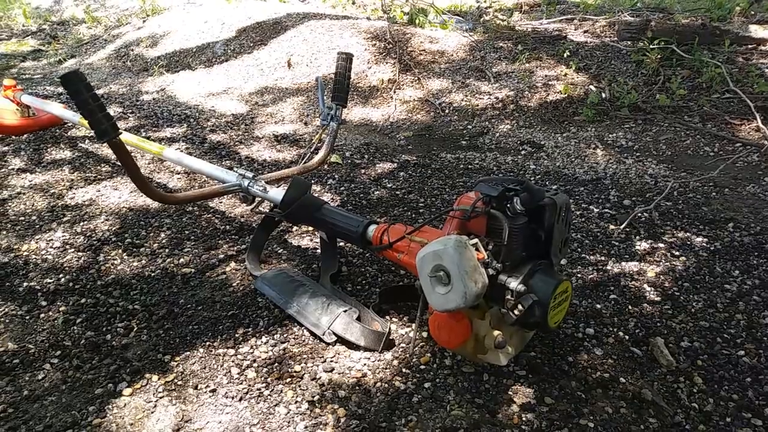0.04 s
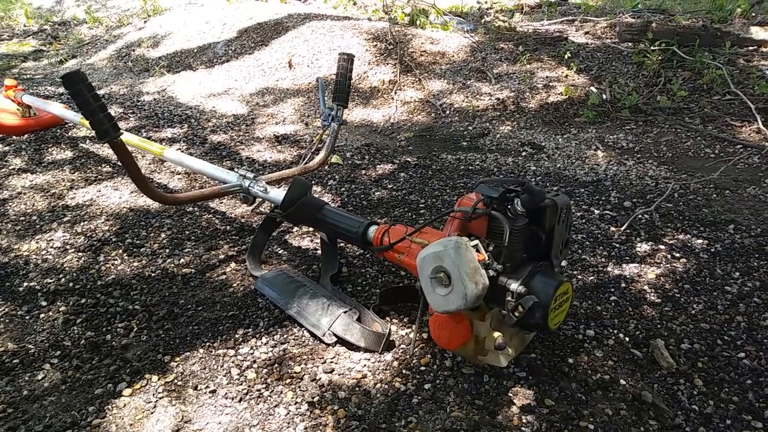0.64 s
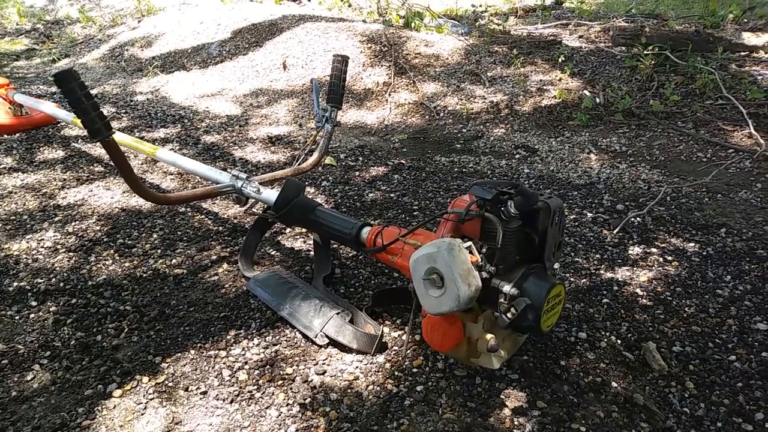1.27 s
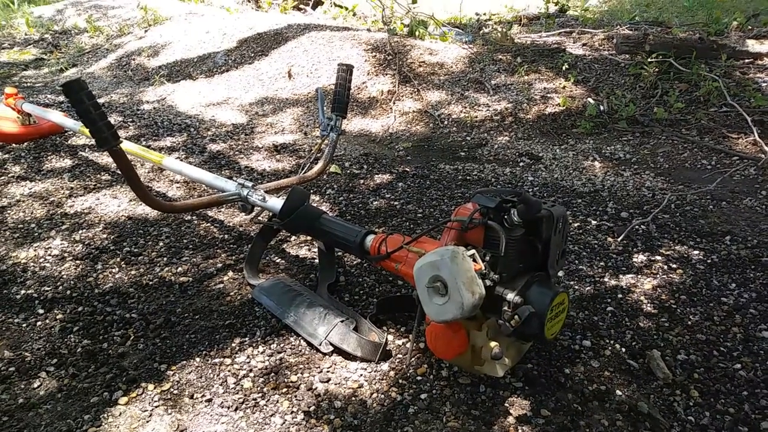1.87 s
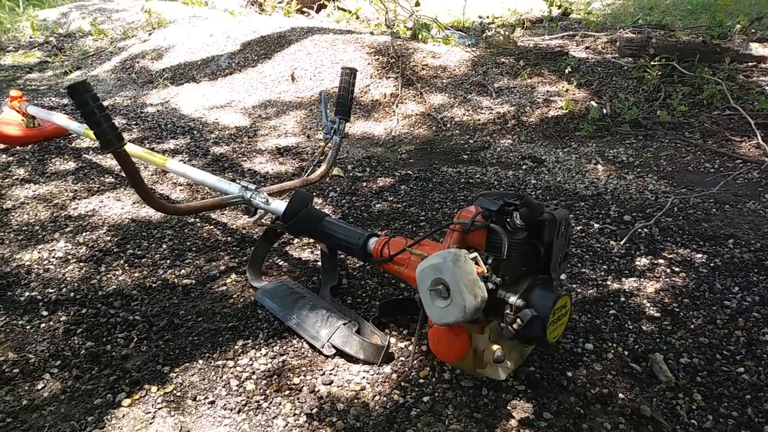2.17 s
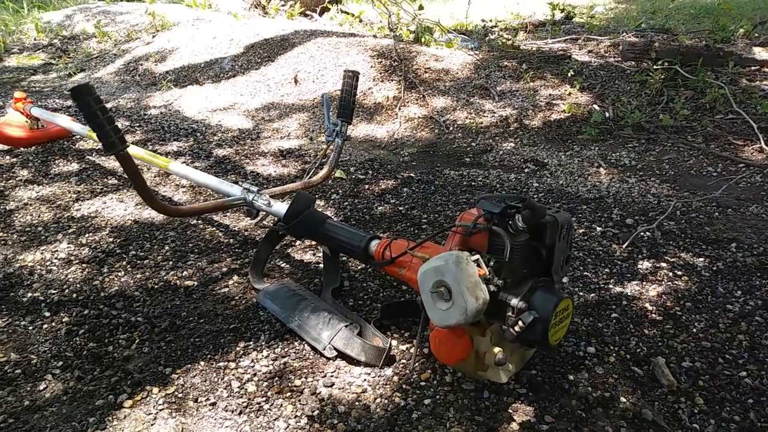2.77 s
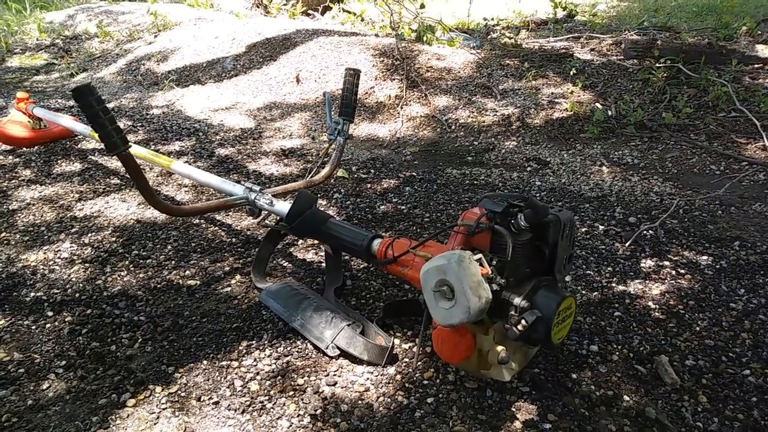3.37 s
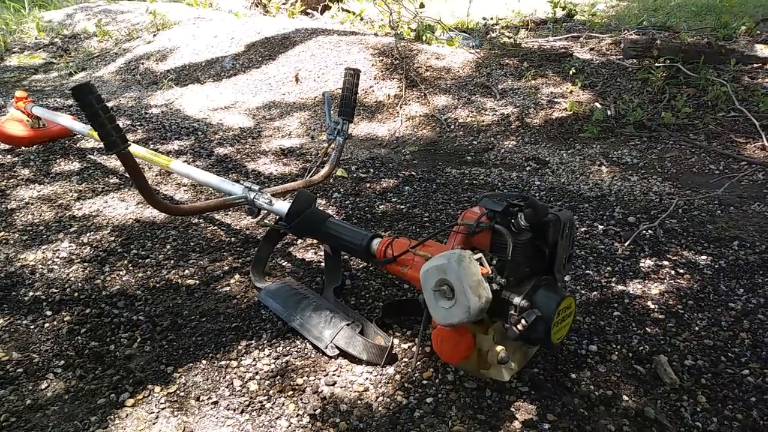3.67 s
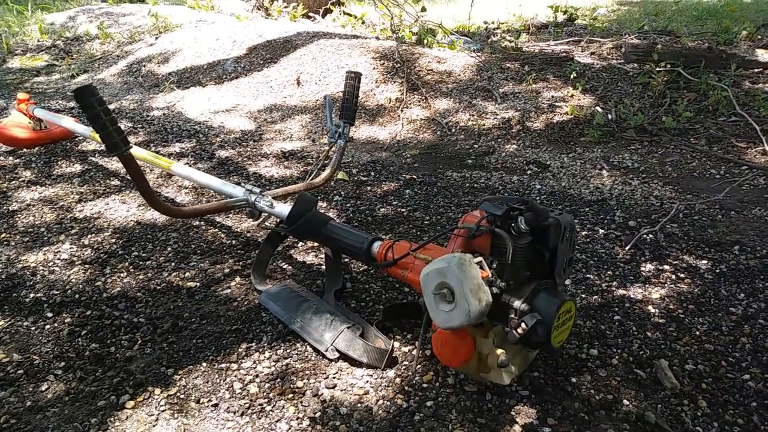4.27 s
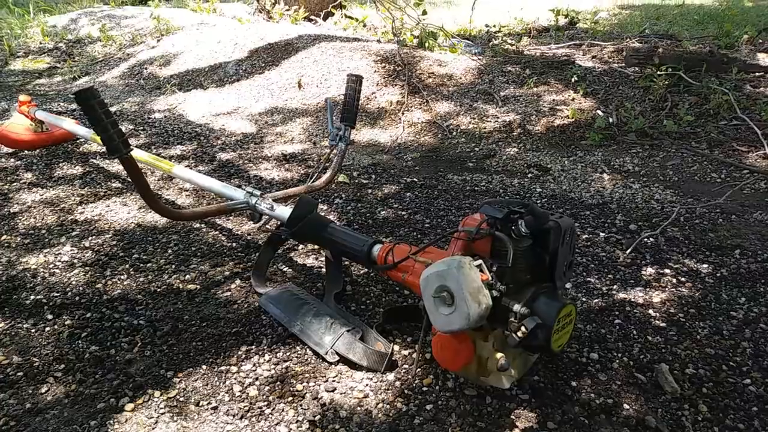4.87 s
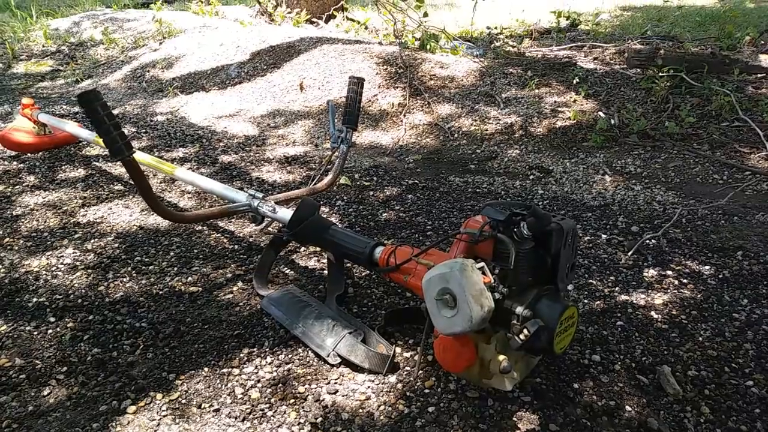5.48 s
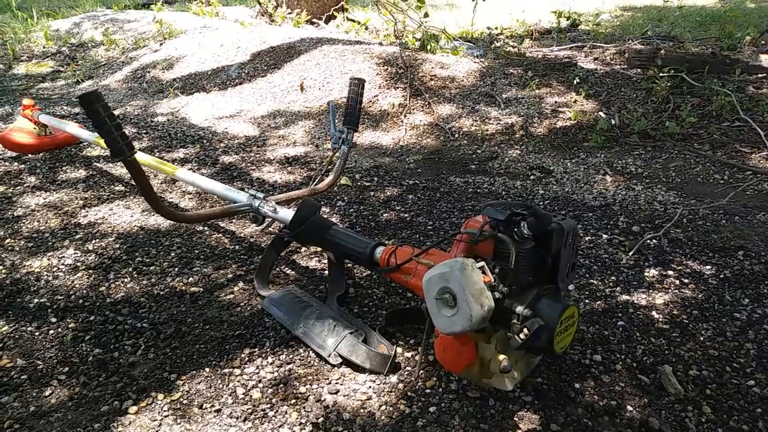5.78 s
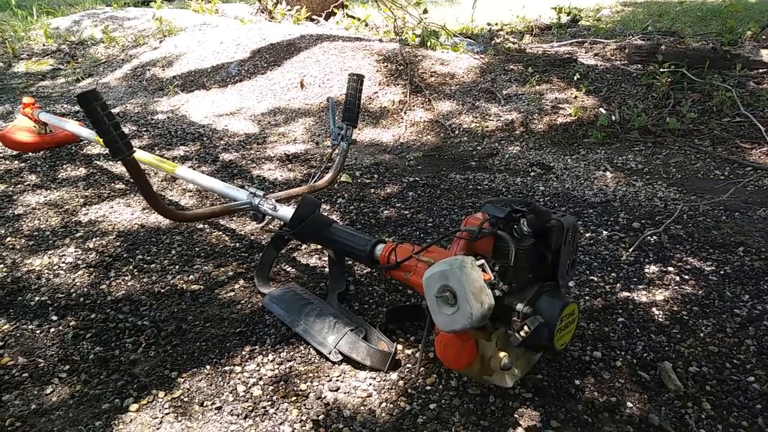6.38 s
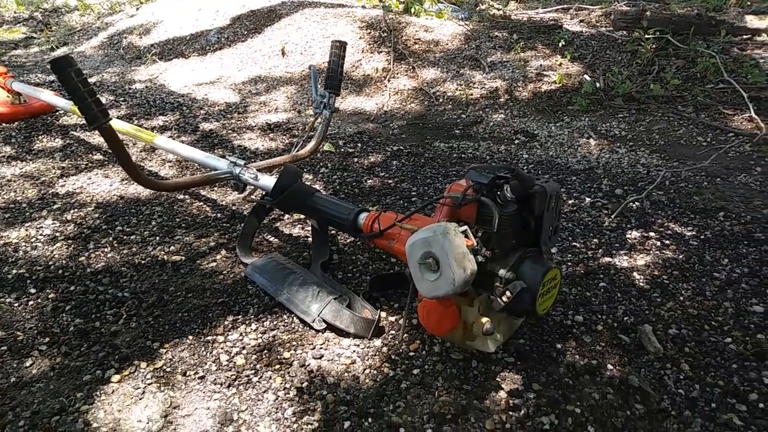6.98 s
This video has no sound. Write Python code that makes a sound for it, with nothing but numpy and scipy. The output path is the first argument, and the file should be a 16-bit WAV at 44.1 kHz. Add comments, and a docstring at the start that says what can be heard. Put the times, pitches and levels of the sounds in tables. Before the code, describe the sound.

A small two-stroke string trimmer idles unevenly, with a bright, ringing metallic rattle clattering over its low putter.

```python
"""A two-stroke string trimmer idles on gravel, about a metre away.
The crank hums, the piston knocks in the finned cylinder and the engine fires unevenly, with dull
pops from the muffler. Fan and muffler hiss; the guard buzzes and small steel parts jingle.
Loose clutch shoes clack against their steel drum, which rings on and warbles with the shaking."""
import sys
import numpy as np
from scipy import signal
from scipy.fft import rfft, irfft, next_fast_len
from scipy.io import wavfile
from scipy.ndimage import uniform_filter1d

SR = 44100
rng = np.random.default_rng(int(sys.argv[2]) if len(sys.argv) > 2 else 0)


def store_pcm(level_fs):
    """Save levels as 16-bit WAV."""
    pcm = np.round(np.clip(level_fs, -1, 1) * 32767).astype(np.int16)
    wavfile.write(sys.argv[1], SR, np.atleast_2d(pcm).T)


N = 318843
TIME = np.arange(N) / SR

# crank speed: (time [s], speed [turns/s])
CRANK_SPEED = [(0.0, 57), (1.35, 56.05), (1.41, 57.6), (1.99, 55.54), (2.52, 57.9), (3.06, 56.52),
               (3.28, 58.0), (3.58, 56.7), (3.66, 54.27), (3.89, 56.45), (4.49, 54.8), (4.55, 55.7),
               (5.05, 54.38), (5.21, 56.64), (6.32, 57.17), (6.36, 55.85), (7.05, 56.77), (7.23, 58.28)]
# bright tick of steel on steel: (frequency [Hz], relative density [dB])
TICK_SPECTRUM = [(6000, -31), (8500, -16), (9100, 5), (9400, 4), (9800, 13), (10350, -2.5), (10800, 3.5),
                 (11700, -1), (12400, -9), (13500, -18), (14400, -13), (14900, 9), (15900, -24)]


def amp(db):
    return 10 ** (np.asarray(db) / 20)


def unit_rms(x):
    return x / np.sqrt(np.mean(x ** 2) + 1e-20)


def add(mix, at_s, sound):
    part = mix[max(round(at_s * SR), 0):][:len(sound)]
    part += sound[:len(part)]


def wander(cutoff_hz, step=16):
    """Low-passed random drift, rms 1."""
    size = next_fast_len(N // step + 2)
    hz = np.fft.rfftfreq(size, step / SR)
    slow = irfft(rfft(rng.standard_normal(size)) / (1 + (hz / cutoff_hz) ** 4), size)
    return unit_rms(np.interp(np.arange(N) / step, np.arange(size), slow))


def colour(x, spectrum, size=2048):
    """Causal filter along (frequency [Hz], level [dB]) points; white input keeps its power."""
    hz, db = np.transpose(spectrum)
    bins_hz = abs(np.fft.fftfreq(size, 1 / SR))
    gain = unit_rms(amp(np.interp(np.log(bins_hz + 1), np.log(hz), db)))
    minimum_phase = np.exp(np.conj(signal.hilbert(np.log(gain))))
    response = np.fft.ifft(minimum_phase).real
    return signal.oaconvolve(x, response[:size // 2])[:N]


def resonate(x, hz, width_hz):
    """Steep resonance: two damped poles in series."""
    pole = np.exp((2j * np.pi * hz - np.pi * width_hz * np.sqrt(2)) / SR)
    return 2 * signal.lfilter([(1 - abs(pole)) ** 2], [1, -2 * pole, pole ** 2], x).real


def turn_times(turns):
    """Times [s] at which the crank completes a turn."""
    return TIME[np.flatnonzero(np.diff(np.floor(turns)) > 0)]


def crank_hum(turns, level_db=-46, waver_db=2):
    """Crank orders, all but the first wavering; 2-4 come from the muffler, 12 from the fan blades."""
    # engine hum: (order [x crank speed], relative level [dB])
    orders = [(1, 7.5), (2, -9.5), (3, 2.5), (4, 3.5), (5, -24), (6, -35), (7, -22), (8, -14.5), (9, -11),
              (10, -32), (11, -33), (12, -4.5), (13, -15.5), (14, -46)]
    # low boom of the muffler: (time [s], gain [dB])
    muffler_boom = [(0, 4), (1.5, 1), (2.5, 3.5), (3.3, -2), (5, -2), (7.23, -10.5)]
    boom = amp(np.interp(TIME, *np.transpose(muffler_boom)))
    uneven_turns = turns + .005 * wander(25)
    out = np.zeros(N)
    for order, db in orders:
        gain = amp(db + (order > 1) * waver_db * wander(24)) * (boom if 2 <= order <= 4 else 1)
        out += gain * np.cos(2 * np.pi * (order * uneven_turns + rng.random()))
    return amp(level_db) * unit_rms(out)


def exhaust(turns, level_db=-56):
    """One steady puff per turn, coloured by the muffler."""
    # muffler response: (frequency [Hz], relative gain [dB])
    muffler = [(150, -4.0), (290, 11.0), (450, -7), (620, -2), (780, -9), (1050, 3.0), (1600, -44.5)]
    puffs = np.diff(np.floor(turns), prepend=0)
    return amp(level_db) * unit_rms(colour(puffs, muffler))


def firing_levels(times_s, arch_db=5, fall_db_per_s=600, vary_db=2, weak_db=-51, weak_vary_db=7):
    """Runs of strong firings swell and die away; turns between them fire weakly or miss."""
    # runs of strong firings: (start [s], length [s], relative level [dB])
    strong_runs = [(0.16, 0.062, -29.5), (0.341, 0.13, -29.5), (0.615, 0.04, -37), (0.708, 0.039, -33.5),
                   (1.156, 0.23, -29), (1.67, 0.12, -28.5), (2.014, 0.073, -33), (2.11, 0.19, -33.5),
                   (2.337, 0.055, -31), (2.397, 0.048, -30), (2.469, 0.04, -39), (2.61, 0.044, -33.5),
                   (2.9, 0.06, -33.5), (3.044, 0.04, -38), (3.094, 0.039, -33.5), (3.64, 0.034, -40.5),
                   (3.698, 0.11, -31.5), (4.152, 0.042, -35), (4.233, 0.067, -35), (4.304, 0.11, -33.5),
                   (4.467, 0.092, -32.5), (4.756, 0.04, -35.5), (4.8, 0.096, -33), (5.099, 0.035, -35.5),
                   (5.219, 0.092, -37.5), (5.362, 0.059, -34.5), (5.504, 0.041, -34), (5.571, 0.048, -41),
                   (5.635, 0.055, -31), (5.968, 0.044, -31.5), (6.205, 0.033, -36.5), (6.644, 0.062, -32.5),
                   (6.812, 0.035, -33.5)]
    start_s, length_s, peak_db = np.transpose(strong_runs)
    off_centre_s = abs(times_s[:, None] - start_s - length_s / 2)
    runs_db = peak_db - arch_db * np.minimum(2 * off_centre_s / length_s, 1) ** 2
    runs_db -= fall_db_per_s * np.maximum(off_centre_s - length_s / 2, 0)
    strong, weak = rng.standard_normal((len(times_s), 2)).T
    return np.maximum(runs_db.max(1) + vary_db * strong, weak_db + weak_vary_db * np.minimum(weak, 1.5))


def firings(turns, pitch_hz=197, sigma_s=.0043, gain_db=6, push=.12, push_hz=118, jitter_s=.002):
    """One dull muffler pop of two or three cycles per turn."""
    t, out = TIME[:SR // 25] - .02, np.zeros(N)
    envelope = np.exp(-(t / sigma_s) ** 2 / 2)
    turn_s = turn_times(turns)
    fire_s = turn_s + jitter_s * rng.standard_normal(len(turn_s))
    for at_s, db in zip(fire_s, firing_levels(turn_s)):
        hz = pitch_hz * (1 + .07 * rng.standard_normal())
        chirp = np.cos(2 * np.pi * hz * (t + 5 * t ** 2) + .5)
        low_push = push * np.cos(2 * np.pi * push_hz * t + .5)
        add(out, at_s + t[0], -amp(db + gain_db) * envelope * (chirp + low_push))
    return out


def piston(turns, slop_turns=.004, pulsing=.38):
    """Uneven knocks, a few per turn, ring the engine block; some turns slap harder."""
    # knocks in each turn: (crank position [turns], relative level [dB])
    knock_pattern = [(.08, -7), (.33, -9), (.57, -8.5), (.8, -16)]
    # cylinder and crankcase modes: (frequency [Hz], width [Hz], level [dB])
    block_modes = [(1393, 47, -62), (1518, 74, -38), (1623, 104, -44.5), (1817, 87, -49.5), (2216, 28, -52),
                   (2472.6, 30.6, -38.5), (2948, 100, -38.5), (3328, 46, -34), (3446, 84, -30.5),
                   (4270, 22, -59), (5030, 13, -53), (6030, 56, -89), (6640, 49, -66)]
    knocks, out = np.zeros((2, N))
    for position, db in knock_pattern:
        at = np.flatnonzero(np.diff(np.floor(turns - position + slop_turns * wander(40))) > 0)
        knocks[at] += amp(db + rng.uniform(-4, 4, N)[at])
    slap = amp(4 * np.tanh(wander(28))) * (1 + pulsing * np.cos(4 * np.pi * turns))
    for hz, width_hz, db in block_modes:
        drive = knocks * amp(rng.uniform(-7, 7, N)) + .006 * rng.standard_normal(N)
        out += amp(db) * unit_rms(resonate(drive * slap, hz, width_hz) * amp(2 * wander(60)))
    return out


def air_hiss(turns, level_db=-45, pulsing=.52):
    """Cooling fan and muffler hiss, puffing with each turn."""
    # air noise: (frequency [Hz], relative density [dB])
    air_spectrum = [(20, -11), (45, 5), (110, 8.5), (220, 8.5), (330, -1.5), (600, -4.5), (850, -14),
                    (1100, -9), (1600, -9.5), (4000, -2), (6500, -9), (8300, -17), (10500, -32),
                    (15500, -23)]
    puffs = rng.standard_normal(N) * (1 + pulsing * np.cos(2 * np.pi * turns))
    return amp(level_db) * unit_rms(colour(puffs, air_spectrum))


def steel(x, ring_db, decay_s, mode_count):
    """Thin steel rings on in many close modes, 2.5-16 kHz; returns x plus its ring."""
    t = TIME[:SR // 6]
    ring = sum(size * np.sin(2 * np.pi * ((2500 + 13500 * place) * t + phase))
               for place, size, phase in rng.random((mode_count, 3)))
    ring *= np.exp(-t / decay_s)
    return x + amp(ring_db) * signal.oaconvolve(x, ring / np.linalg.norm(ring))[:N]


def loose_parts(turns, sizzle_gain_db=1, jingle_gain_db=-5, pulsing=.36, unrest_db=3, clump_db=5):
    """The guard buzzes softly with the shaking; small steel parts jingle in short fits."""
    # loose parts, relative levels: (time [s], guard sizzle [dB], jingle [dB])
    buzz_levels = [(0.0, -39, -41.5), (0.5, -54, -43.5), (1.05, -70, -43.5), (1.45, -44, -40),
                   (1.91, -45, -54), (2.35, -24.5, -55), (3.64, -34.5, -52), (3.92, -34.5, -72),
                   (4.11, -35.5, -76.5), (4.33, -31, -58), (5.11, -34, -67), (5.46, -25, -48),
                   (7.11, -34.5, -64), (7.23, -25, -55)]
    # buzz of the guard: (frequency [Hz], relative density [dB])
    guard_spectrum = [(3800, -32), (4700, 0), (5000, 10), (5400, 18.5), (6000, 9), (6500, 19.5), (7100, 5),
                      (7500, -8.5), (8300, -86), (12000, -57)]
    times_s, sizzle_db, jingle_db = np.transpose(buzz_levels)
    shaking = (1 + pulsing * np.cos(4 * np.pi * turns)) * amp(unrest_db * wander(53))
    guard, parts = shaking * rng.standard_normal((2, N))
    fits = amp(2 * clump_db * np.tanh(wander(35) / 2))
    parts = steel(parts * fits, ring_db=-3, decay_s=.003, mode_count=60)
    sizzle = amp(np.interp(TIME, times_s, sizzle_db)) * unit_rms(colour(guard, guard_spectrum))
    jingle = amp(np.interp(TIME, times_s, jingle_db)) * unit_rms(colour(parts, TICK_SPECTRUM))
    return amp(sizzle_gain_db) * sizzle + amp(jingle_gain_db) * jingle


def stray_taps(turns, chance=.14, clank_db=-39, tick_db=-45, ping_db=-29, ring_db=-40, vary_db=5):
    """On any turn a shoe may just touch the drum."""
    times_s = turn_times(turns)
    luck, force = rng.random((len(times_s), 2)).T
    levels_db = np.array([clank_db, tick_db, ping_db, ring_db]) + vary_db * (2 * force[:, None] - 1)
    return list(np.column_stack([times_s, levels_db])[luck < chance])


def rebounds(clank_db=-17, tick_db=-15, ping_db=-7):
    """A clean rebound is mostly ring, with a tick and little clank."""
    # clean rebounds of a shoe: (time [s], relative ring level [dB])
    drum_rings = [(0.109, -21.5), (0.234, -19.5), (0.423, -17), (0.495, -16), (0.531, -17), (0.563, -21),
                  (0.788, -20.5), (1.302, -14), (1.337, -14.5), (1.392, -10.5), (1.424, -12),
                  (1.459, -12.5), (1.494, -17), (1.599, -17), (1.632, -16), (1.772, -19), (2.048, -13),
                  (2.173, -8.5), (2.231, -17), (2.475, -17), (2.545, -14), (2.614, -17), (2.701, -16),
                  (2.737, -17.5), (2.807, -18), (2.856, -15.5), (3.099, -12), (3.188, -13), (3.307, -17),
                  (3.441, -15), (3.533, -16.5), (4.509, -17.5), (4.848, -13.5), (5.369, -14.5),
                  (5.507, -17.5), (5.647, -15.5), (5.715, -10.5), (5.779, -15.5), (5.822, -20.5),
                  (5.892, -20.5), (5.924, -21), (6.151, -17), (6.534, -22.5), (7.085, -16), (7.136, -13)]
    return [(at_s, db + clank_db, db + tick_db, db + ping_db, db) for at_s, db in drum_rings]


def clack_runs(vary_db=1.6, ping_vary_db=2, ring_over_tick_db=5):
    """A shoe swings against the drum every few turns; the louder its tick, the more the drum rings."""
    # runs of clacks: (first [s], last [s], spacing [turns], clank [dB], tick [dB], ping [dB])
    runs = [(0.157, 0.158, 3, -20.5, -24.5, -10.5), (0.316, 0.422, 3, -21, -32, -18.5),
            (0.611, 0.717, 6, -15.5, -28, -10.5), (0.665, 0.665, 3, -36, -36, -20),
            (1.124, 1.178, 3, -30, -42, -44), (1.23, 1.23, 3, -14.5, -23.5, -13),
            (1.391, 1.494, 2, -55, -27.5, -22), (1.542, 1.682, 8, -19.5, -21.5, -8),
            (1.857, 1.984, 3, -32, -44, -59), (2.036, 2.107, 4, -22, -34, -12),
            (2.16, 2.231, 4, -17, -34, -9), (2.283, 2.283, 3, -21.5, -35, -26),
            (2.336, 2.614, 4, -13.5, -33.5, -11), (2.666, 2.807, 2, -35, -38, -12.5),
            (2.856, 2.907, 3, -16.5, -35, -9), (2.959, 2.999, 2, -23.5, -32, -30),
            (3.048, 3.099, 3, -17, -31, -10.5), (3.188, 3.236, 3, -23, -30, -12.5),
            (3.392, 3.497, 3, -23.5, -31.5, -13), (3.533, 3.794, 3, -17.5, -39, -13.5),
            (4.004, 4.077, 4, -44, -64, -17), (4.131, 4.237, 3, -16.5, -34.5, -7),
            (4.291, 4.399, 3, -20, -38, -11.5), (4.454, 4.508, 3, -17.5, -46, -19),
            (4.578, 4.668, 5, -25, -62, -18), (4.738, 4.793, 3, -21, -32.5, -6.5),
            (4.848, 4.848, 3, -17.5, -33, -23), (5.087, 5.087, 3, -18.5, -58, -18),
            (5.211, 5.369, 3, -17, -36, -18), (5.456, 5.456, 3, -21.5, -36, -14.5),
            (5.507, 5.715, 4, -15, -28, -6), (5.976, 6.046, 4, -15.5, -30.5, -9),
            (6.114, 6.2, 5, -21.5, -31, -10.5), (6.305, 6.357, 3, -19, -31.5, -13.5),
            (6.409, 6.438, 2, -27, -47, -13.5), (6.587, 6.693, 3, -19, -33, -6.5),
            (6.799, 6.799, 3, -18, -31, -9.5), (6.842, 7.012, 10, -21.5, -51, -32),
            (7.136, 7.186, 3, -18, -32, -11)]
    hits = []
    for first_s, last_s, spacing, clank_db, tick_db, ping_db in runs:
        crank_hz = np.interp(first_s, *np.transpose(CRANK_SPEED))
        gaps = round((last_s - first_s) * crank_hz / spacing)
        for at_s in np.linspace(first_s, last_s, gaps + 1):
            force_db, scuff_db = rng.uniform(-1, 1, 2) * (vary_db, ping_vary_db)
            ring_db = tick_db + force_db + ring_over_tick_db
            hits.append((at_s, clank_db + force_db, tick_db + force_db, ping_db + scuff_db, ring_db))
    return hits


def shoe_hits(turns):
    """All shoe-drum contacts, sorted: (time [s], clank [dB], tick [dB], ping [dB], ring [dB])."""
    hits = np.array(clack_runs() + rebounds() + stray_taps(turns))
    return hits[np.argsort(hits[:, 0])]


def chatter(times_s, levels_db, bounce_s=.004, bounce_db=-3, decay_s=.0031,
            tail_db=-15, tail_s=.0022, scuff_db=-22, scuff_s=.0041):
    """A shoe scuffs, strikes, bounces twice and scrapes to rest."""
    t, out = TIME[:SR // 10] - .015, np.zeros(N)
    scuff = amp(scuff_db) * np.exp(-abs(t) / scuff_s)
    scrape = amp(tail_db) * np.exp(-abs(t) / tail_s)
    for at_s, db in zip(times_s, levels_db):
        envelope = np.where(t < 0, scuff, scrape)
        for bounce in range(3):
            age_s = t - bounce * bounce_s * rng.uniform(.76, 1.6)
            strength = amp(bounce * bounce_db * rng.uniform(0, 2.2))
            envelope += strength * (age_s >= 0) * np.exp(-abs(age_s) / decay_s)
        add(out, at_s + t[0], amp(db) * unit_rms(envelope * rng.standard_normal(len(t))))
    return out


def clacks(hits, clank_gain_db=2, tick_gain_db=-10, chime_gain_db=-8):
    """Hits clank in the housing, each in its own colour, and tick on steel; rebounding shoes chime."""
    # clutch housing modes: (frequency [Hz], width [Hz], gain [dB])
    housing_modes = [(1232, 34, -14), (1438, 64, -6.5), (1870, 400, -12), (2394, 280, -8.5),
                     (2938, 88, 4.5), (3426, 175, 1.5), (4053, 45, 1.5), (4653, 140, -2.5), (4775, 44, -1),
                     (5966, 523, 3.5), (6465, 126, 6), (6710, 120, -4), (7144, 108, -1), (7930, 43, -8.5),
                     (11140, 640, -17.5), (13800, 700, -17)]
    # clutch shoe modes: (frequency [Hz], width [Hz], gain [dB])
    shoe_modes = [(9100, 180, -17), (9300, 100, -21), (10295, 124, 1), (10350, 76, 6.5), (13100, 50, -25),
                  (15300, 63, -13)]
    times_s, clank_db, tick_db, _, ring_db = hits.T
    blows = steel(chatter(times_s, clank_db), ring_db=-11, decay_s=.016, mode_count=400)
    clank = sum(amp(db) * resonate(blows * amp(4 * np.tanh(wander(10)) - 1), hz, width_hz)
                for hz, width_hz, db in housing_modes)
    clank = signal.sosfilt(signal.butter(4, 1150, "high", fs=SR, output="sos"), clank)
    ticks = chatter(times_s, tick_db, bounce_s=.0028, bounce_db=-4.5, decay_s=.0029,
                    tail_db=-10, tail_s=.0046, scuff_db=-32)
    rebound = chatter(times_s, ring_db, bounce_s=.003, bounce_db=-6, decay_s=.003, scuff_db=-20)
    chime = sum(amp(db) * resonate(rebound, hz, width_hz) for hz, width_hz, db in shoe_modes)
    ticks = colour(steel(ticks, ring_db=-10.5, decay_s=.021, mode_count=70), TICK_SPECTRUM)
    return amp(clank_gain_db) * clank + amp(tick_gain_db) * ticks + amp(chime_gain_db) * chime


def pings(hits, centre_hz=5470, scatter_hz=70, min_swell_s=.0032, gain_db=2):
    """A shoe scuffs the drum: a brief rough squeak, never at quite the same pitch."""
    t, out = TIME[:SR // 20], np.zeros(N, complex)
    for at_s, _, _, ping_db, _ in hits:
        progress = t / (min_swell_s * rng.uniform(1, 2))
        envelope = (progress * np.exp(1 - progress)) ** 2
        hz = centre_hz + scatter_hz * rng.standard_normal()
        add(out, at_s, amp(ping_db + gain_db) * envelope * np.exp(2j * np.pi * hz * t))
    roughness = np.exp(.7j * wander(200)) * (1 + .35 * wander(300))
    return (out * roughness).real


def drum_ring(turns, hits, fade_db_per_s=110, gain_db=3, drift_hz=4, warble_rad=.34, throb=.36):
    """A hit louder than the dying ring restarts it; the engine shakes the drum twice a turn."""
    # clutch drum modes: (frequency [Hz], relative level [dB])
    drum_modes = [(5719, 0), (5740, -19.5), (9797, -42)]
    times_s, *_, ring_db = hits.T
    height_db = ring_db + fade_db_per_s * times_s
    restarts = height_db >= np.maximum.accumulate(height_db)
    jumps_rad = 1.3 * rng.standard_normal(len(times_s))
    times_s, ring_db = times_s[restarts], ring_db[restarts]
    latest = np.maximum(np.searchsorted(times_s, TIME) - 1, 0)
    phase = np.cumsum(jumps_rad[restarts])[latest] + 2 * np.pi * np.cumsum(drift_hz * wander(12)) / SR
    decay = amp(ring_db[latest] - fade_db_per_s * abs(TIME - times_s[latest])) * (TIME >= times_s[0])
    ring = uniform_filter1d(decay * np.exp(1j * phase), size=130)  # 3 ms attack
    shake_rad = 4 * np.pi * turns + .55 * wander(6)
    tremolo = throb * np.cos(shake_rad) * (1 + .4 * wander(3))
    roughness = .22 * (wander(130) + 1j * wander(130))
    ring *= 1 + tremolo + roughness
    ring *= np.exp(1j * warble_rad * (np.cos(shake_rad) + .067 * np.sin(2 * shake_rad)))
    return sum(amp(db + gain_db) * (ring * np.exp(2j * np.pi * hz * TIME)).real for hz, db in drum_modes)


def scene():
    """The engine and its rattling clutch share one crank."""
    crank_hz = np.interp(TIME, *np.transpose(CRANK_SPEED))
    turns = np.cumsum(crank_hz) / SR
    engine = crank_hum(turns) + exhaust(turns) + firings(turns) + piston(turns) + air_hiss(turns)
    hits = shoe_hits(turns)
    rattle = clacks(hits) + pings(hits) + drum_ring(turns, hits) + loose_parts(turns)
    return (engine + rattle)[None]


def record(dry, ceiling=.93, cutoff_hz=16000):
    """Soft peak limit, then low-pass."""
    rounded = dry / (1 + (dry / ceiling) ** 8) ** (1 / 8)
    lowpass = signal.firwin(401, cutoff_hz, window=("kaiser", 9), fs=SR)
    return signal.oaconvolve(rounded, lowpass[None], "same")


dry = scene()
out = record(dry)
store_pcm(out)
```